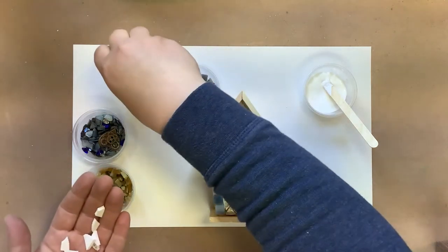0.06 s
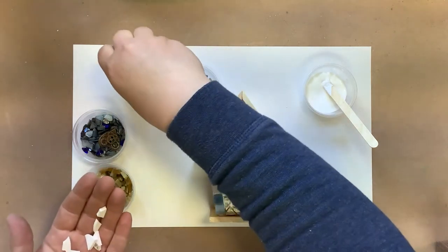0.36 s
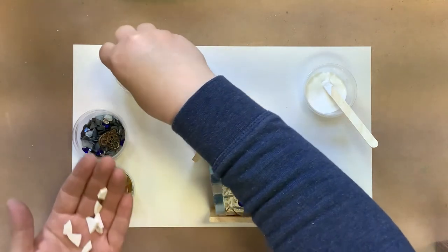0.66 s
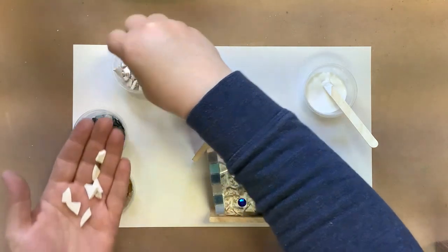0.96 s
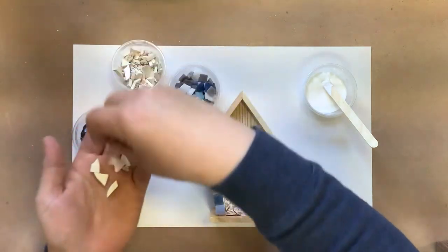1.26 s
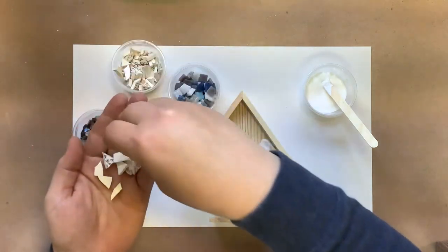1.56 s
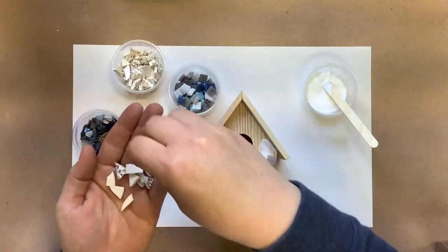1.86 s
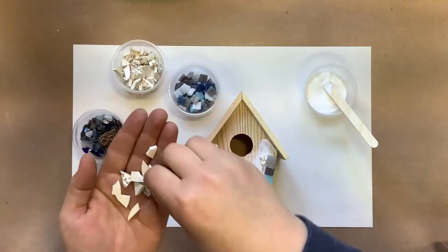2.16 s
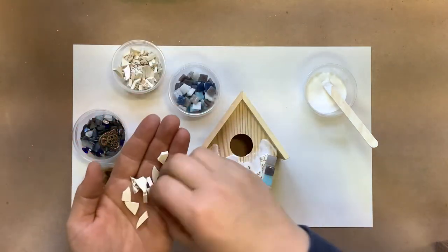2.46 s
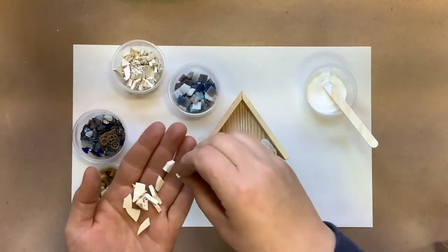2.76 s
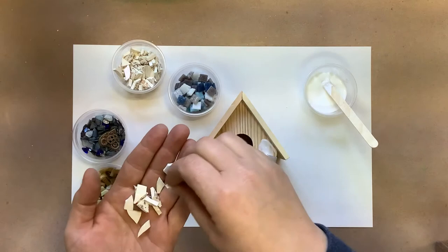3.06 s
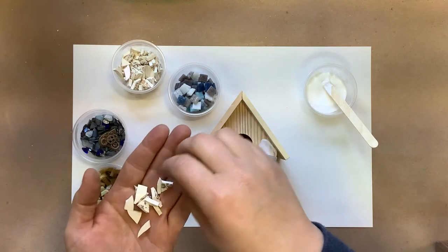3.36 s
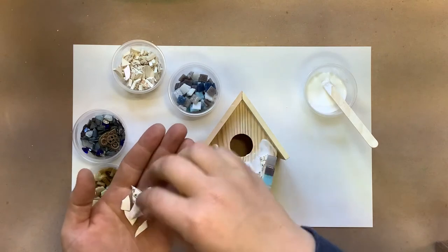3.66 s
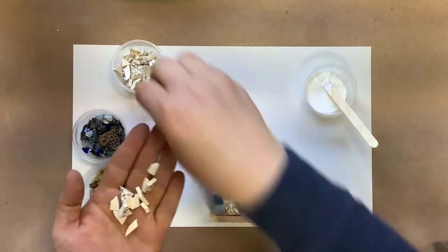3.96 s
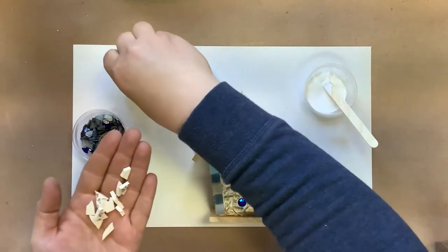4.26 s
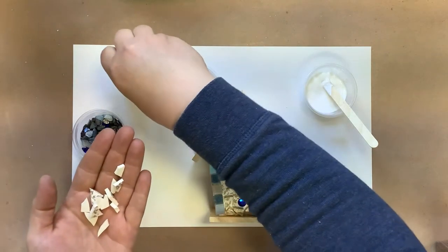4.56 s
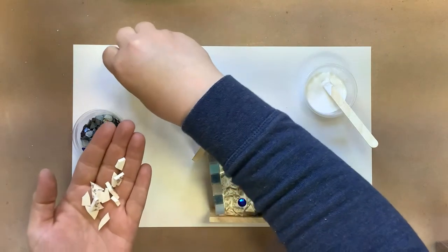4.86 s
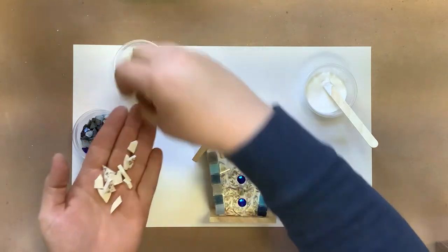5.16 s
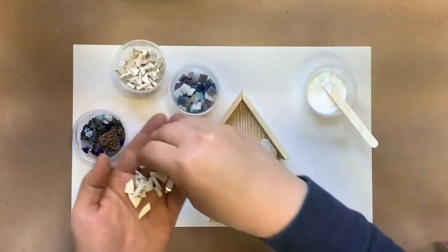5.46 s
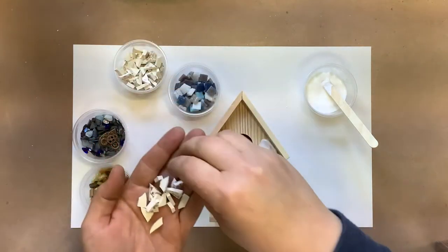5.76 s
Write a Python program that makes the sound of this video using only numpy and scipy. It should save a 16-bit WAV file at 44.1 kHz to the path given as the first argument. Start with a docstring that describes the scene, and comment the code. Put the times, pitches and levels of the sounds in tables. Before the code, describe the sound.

Fingers dig twice through shell fragments in a small plastic cup, with tiny clinks in between, in a quietly humming room.

```python
"""A hand digs through broken shell in a small plastic cup on a table: pieces crunch in avalanches of
contacts, one knocks the wall, and the table top drones faintly. Picked pieces drop into the other
palm and are nudged about: tiny damped clinks, faint rasps, one dull creak, a brushing sleeve.
At 4.2 s the hand digs again; a few last clinks follow.
Throughout, a small room answers and a mains appliance hums."""
import sys
import numpy as np
from scipy import signal
from scipy.fft import rfft, irfft, next_fast_len
from scipy.io import wavfile
from scipy.ndimage import map_coordinates

SR = 44100
rng = np.random.default_rng(int(sys.argv[2]) if len(sys.argv) > 2 else 0)


def store_wav(level_fs):
    """Save 16-bit WAV to argv[1]."""
    pcm = np.round(np.clip(np.atleast_2d(level_fs), -1, 1) * 32767)
    wavfile.write(sys.argv[1], SR, pcm.T.astype(np.int16))


N = 265790

# fingers shove the heap (start [s], length [s], level [dB], piece pitch [Hz])
HEAP_SHOVES = [(0.073, 0.013, -41, 10000), (0.093, 0.016, -41, 4000), (0.134, 0.0093, -40.5, 9500),
               (0.15, 0.0039, -32.5, 9500), (0.157, 0.0037, -32, 2330), (0.166, 0.016, -38.5, 10000),
               (0.201, .02, -39.5, 6000), (0.289, .008, -40.5, 6000), (0.304, .011, -35.5, 6000),
               (0.313, 0.0026, -36, 1800), (0.35, 0.0022, -37.5, 12000), (0.464, 0.0024, -35.5, 11000),
               (0.482, 0.0032, -36, 11000), (0.497, 0.031, -38.5, 6000), (0.529, .013, -32, 7500),
               (0.571, 0.013, -42.5, 5980), (0.596, .011, -43.5, 6000), (0.648, 0.0056, -31.5, 6000),
               (0.794, 0.0022, -40, 5000), (0.813, .003, -36.5, 5000), (0.823, 0.0018, -37, 6000),
               (0.832, .018, -44, 4000), (4.214, 0.0025, -41, 11000), (4.234, 0.024, -45, 4000),
               (4.343, 0.0033, -41.5, 10000), (4.39, 0.014, -34.5, 10000), (4.411, 0.014, -36, 2500),
               (4.426, .016, -31, 9500), (4.522, .004, -38, 6000), (4.549, 0.024, -38.5, 6000),
               (4.574, .015, -29, 6000), (4.616, 0.0046, -43.5, 2300), (4.709, 0.0042, -34, 6000),
               (4.72, 0.01, -36.5, 6000), (4.758, .008, -38.5, 6000), (4.766, 0.0029, -31.5, 5000),
               (4.812, 0.0091, -39, 2500), (4.88, 0.0018, -32.5, 4920), (4.976, 0.0018, -50.5, 5500),
               (5, 0.0022, -45.5, 6000), (5.012, .002, -41, 9600), (5.021, 0.0016, -35, 3200),
               (5.047, 0.0022, -45.5, 5500)]
# hand keeps the heap sliding (start [s], deepest [s], end [s], top level [dB], swell [dB])
HAND_DIGS = [(0, 0.526, 0.91, -48.5, 2.5), (4.194, 4.55, 4.957, -43.5, 17)]
# heap spectrum (frequency [Hz], relative level [dB])
HEAP_SPECTRUM = [(150, -8.5), (480, -9), (650, -4.5), (900, -5.5), (1400, -4), (2200, 1), (2950, -7),
                 (3600, -2.5), (4700, -5.5), (5500, -1), (8000, -3), (9400, 0), (11000, -4), (13200, -1.5),
                 (15500, -12.5)]
# resonances of the filled cup (centre [Hz], width [Hz], lift [dB])
CUP_RESONANCES = [(1280, 120, 4), (2000, 160, 3), (2320, 130, 4), (2630, 130, 6), (3850, 400, 4),
                  (5030, 160, 3), (6000, 450, 5), (6590, 120, 3)]
# pieces hit the cup wall (time [s], relative level [dB])
WALL_KNOCKS = [(0.3132, -28.5), (5.024, -49)]
# cup wall modes (frequency [Hz], relative level [dB], t60 [s])
WALL_MODES = [(1270, -6, 0.03), (1548, -3, 0.06), (2118, -4, 0.08), (2320, 5, .04), (2480, -6, .02),
              (2646, -2, 0.06), (2850, -17, .04), (3483, -10.5, 0.027)]
# pieces touch in the palm (time [s], relative level [dB], pitch [Hz])
PALM_CLINKS = [(1.2567, -28, 11800), (1.2645, -21.5, 8800), (1.2743, -20.5, 10900), (1.3368, -25.5, 9600),
               (1.348, -24, 9350), (1.357, -28.5, 13000), (1.4581, -33.5, 13700), (1.6765, -39.5, 9300),
               (2.2617, -34.5, 13100), (2.4339, -33.5, 9000), (2.6802, -35, 13800), (3.139, -36.5, 13900),
               (3.161, -39, 9400), (3.455, -42, 10800), (3.485, -37, 13300), (3.4976, -32, 13700),
               (3.6397, -39.5, 13200), (3.6875, -49, 12400), (3.8042, -38.5, 10350), (5.3097, -27, 10300),
               (5.3706, -30, 11000), (5.3884, -27.5, 9600), (5.5474, -34.5, 12300), (5.9918, -43, 10400)]
# crack of a small piece (frequency [Hz], relative level [dB])
CRACK_SPECTRUM = [(500, -38), (1500, -28), (3500, -24), (5500, -12), (7800, -7), (9200, 2), (11200, -4),
                  (13400, 1), (15500, 1)]
# fingertips drag pieces in the palm (start [s], length [s], level [dB])
PALM_RUBS = [(1.335, .03, -49), (2.2, .1, -69), (2.24, .028, -60), (2.33, .06, -70), (2.617, .018, -70),
             (3.453, .008, -52), (3.475, .07, -60)]
# rasp of dragged pieces (frequency [Hz], relative level [dB])
RASP_SPECTRUM = [(700, -20), (2100, -7), (3200, -15), (6500, 2), (9500, 5.5), (15000, -4)]
# fingers press cup on table (start [s], hardest [s], end [s], relative level [dB], swell [dB])
CUP_PRESSES = [(0, .55, 0.88, -58.5, 10), (4.437, 4.47, 4.74, -52.5, 7)]
# sleeve brushes (start [s], length [s], level [dB])
SLEEVE_BRUSHES = [(1.656, .22, -82), (2.463, 0.19, -80.5), (5.098, 0.39, -83), (5.654, 0.35, -85.5)]
# room decay (frequency [Hz], t60 [s])
ROOM_DECAY = [(300, 0.66), (2000, 0.4), (8000, 0.31), (15000, 0.073)]
# mains hum partials (frequency [Hz], rms level [dB])
HUM_PARTIALS = [(120, -81), (240, -68.5), (359.8, -55.5), (420, -77), (480, -83.5), (600, -86)]
# room air (frequency [Hz], relative level [dB])
AIR_SPECTRUM = [(25, -34), (38, -12), (60, -5), (108, 2), (140, -1.5), (190, -3), (280, -3), (400, -7),
                (700, -19.5), (1000, -22), (1300, -26), (2000, -28), (4000, -34.5), (5700, -28),
                (15500, -30)]
# microphone response (frequency [Hz], gain [dB])
MIC_RESPONSE = [(22, -22), (40, 0), (13600, 0), (14300, -2), (14850, -8), (15450, 3), (15750, 1),
                (16000, -12)]


def shoves(build_db=2.5, usual_s=0.0097, usual_hz=6000, sparkle_db_per_oct=3):
    """Each shove builds an avalanche of contacts; long ones sound fuller and settle more slowly."""
    out, t = np.zeros(N), np.arange(SR // 16) / SR
    for start_s, length_s, db, piece_hz in HEAP_SHOVES:
        settle_s = 0.0055 * (length_s / usual_s) ** 0.49
        build = amp(build_db * np.minimum(t / length_s, 1))
        settle = np.exp(-np.maximum(t - length_s, 0) / settle_s)
        hits = contacts(len(t), per_s=8000, spread_db=3.5) * build * settle
        weight_db = 1.5 * np.log2(length_s / usual_s)
        treble_db = 0.5 + sparkle_db_per_oct * np.log2(piece_hz / usual_hz)  # small pieces are brighter
        tilt = [(700, weight_db), (1400, -1), (2600, -1), (4000, 0), (6500, 0), (9000, treble_db)]
        colour = lambda hz: cup_db(hz) + along(tilt, hz) + lift(hz, piece_hz, 0.34 * piece_hz, db=5)
        burst = coloured(shards(hits, t60_s=0.0067, ringing=0.94), colour)
        add(out, start_s, amp(db) * np.sqrt(length_s * SR) * unit_energy(burst))
    return out


def stirring(uneven_db=2.5, snap_db=-8):
    """Pieces scrape in fine, uneven slips; now and then one snaps free."""
    slips = shards(contacts(N, per_s=1600, spread_db=0.5), t60_s=0.004, ringing=0.67)
    slips *= amp(uneven_db * wobble(60))
    snaps = shards(contacts(N, per_s=60, spread_db=6), t60_s=0.0084, ringing=1)
    heap = coloured(unit_rms(slips) + amp(snap_db) * unit_rms(snaps), cup_db)
    return sum(gesture(*dig) for dig in HAND_DIGS) * unit_rms(heap)


def contacts(size, per_s, spread_db):
    """Random impulses of uneven strength."""
    happens = rng.random(size) < per_s / SR
    return happens * rng.choice([-1, 1], size) * amp(spread_db * np.clip(rng.standard_normal(size), -2, 2))


def shards(hits, t60_s, ringing):
    """Each contact is a dry tick plus the short ring of a piece of random size."""
    t, onsets = np.arange(SR // 100) / SR, np.flatnonzero(hits)
    modes = ring(t, rng.uniform(1494, 15870, (len(onsets), 1)), t60_s)
    modes *= ringing * hits[onsets, None] / np.linalg.norm(modes, axis=1, keepdims=True)
    samples = onsets[:, None] + np.arange(len(t))
    return hits + np.bincount(samples.ravel(), modes.ravel(), len(hits))[:len(hits)]


def cup_db(hz):
    """Heap spectrum, lifted at the cup's resonances."""
    return along(HEAP_SPECTRUM, hz) + sum(lift(hz, *resonance) for resonance in CUP_RESONANCES)


def gesture(start_s, peak_s, end_s, db, swell_db, release_db_per_s=269):
    """Gain of one push of the hand: swell, ease off, let go."""
    t = np.arange(N) / SR
    outside_s = np.maximum(start_s - t, 0) + np.maximum(t - end_s, 0)
    below_peak_db = np.interp(t, [start_s, peak_s, end_s], [swell_db, 0, swell_db])
    return amp(db - below_peak_db - release_db_per_s * outside_s)


def knocks(gain_db=-5, scatter_db=0.97):
    """The thin plastic wall rings briefly when a piece snaps against it."""
    out, t = np.zeros(N), np.arange(SR // 5) / SR
    for time_s, db in WALL_KNOCKS:
        wall = sum(amp(mode_db + rng.normal(0, scatter_db)) * ring(t, hz, t60_s)
                   for hz, mode_db, t60_s in WALL_MODES)
        add(out, time_s, amp(db + gain_db) * wall)
    return out


def clinks(gain_db=11, lag_s=0.0007, rebound_db=-9, rock_gap_s=0.011, rock_db=-15.5, loss_db=1.5):
    """Each touch clinks, rebounds once and rocks to rest in three weaker ticks."""
    out = np.zeros(N)
    for time_s, db, hz in PALM_CLINKS:
        gain = amp(db + gain_db)
        add(out, time_s + lag_s, gain * clink(hz))
        add(out, time_s + rng.uniform(0.0022, 0.005), gain * amp(rebound_db) * clink(hz))
        for k, delay_s in enumerate(np.cumsum(rock_gap_s * rng.uniform(0.5, 1.5, 3))):
            tick = clink(hz=rng.uniform(9000, 13500))
            add(out, time_s + delay_s, gain * amp(rock_db - loss_db * k) * tick)
    return out


def clink(hz, t60_s=0.004, contact_s=0.0002, others_db=-6, crack_db=5, crack_t60_s=0.005):
    """A piece damped by the palm: one main mode, three weaker ones and a crack."""
    t = np.arange(SR // 40) / SR
    attack = 1 - np.exp(-t / contact_s)
    others = sum(ring(t, other_hz, t60_s) for other_hz in rng.uniform(7400, 14000, 3))
    modes = attack * (ring(t, hz, t60_s) + amp(others_db) * others)
    burst = rng.standard_normal(len(t)) * attack * decay(t, crack_t60_s)
    crack = coloured(burst, lambda f: along(CRACK_SPECTRUM, f) + lift(f, hz, width_hz=1800, db=7))
    return unit_energy(modes + amp(crack_db) * crack)


def rubs():
    """Dragged pieces rasp, swelling and fading with the stroke."""
    out = np.zeros(N)
    for start_s, length_s, db in PALM_RUBS:
        size = round(length_s * SR)
        grit = shards(contacts(size, per_s=1900, spread_db=12), t60_s=0.023, ringing=1)
        rasp = coloured(grit, lambda hz: along(RASP_SPECTRUM, hz))
        stroke = np.sqrt(np.abs(np.sin(np.linspace(0, np.pi, size))))
        add(out, start_s, amp(db) * unit_rms(rasp) * stroke)
    return out


def creak(start_s=1.602, length_s=0.028, from_hz=1400, to_hz=300, body_hz=690, gain_db=-54):
    """The hands meet with a dull creak: seven slips, falling in pitch."""
    out, t = np.zeros(N), np.arange(SR // 10) / SR
    attack = 1 - np.exp(-t / 0.0001)
    for progress in np.linspace(0, 1, 7):
        hz = from_hz * (to_hz / from_hz) ** progress
        slip = ring(t, hz, t60_s=18 / hz) + 0.8 * ring(t, body_hz, t60_s=0.026)
        time_s = start_s + length_s * progress + rng.normal(0, 0.00055)
        add(out, time_s, amp(gain_db) * slip * attack)
    return out


def table_drone(hz=107, gain_db=-2, drift_rad=0.9, waver_db=2):
    """Rummaging drives the table top's lowest mode, a little unsteadily."""
    phase = 2 * np.pi * hz * np.arange(N) / SR + drift_rad * wobble(14)
    drone = np.sin(phase) * amp(waver_db * wobble(20))
    return amp(gain_db) * sum(gesture(*press) for press in CUP_PRESSES) * unit_rms(drone)


def sleeve(centre_hz=1350, width_hz=500):
    """Cloth slides as the arm moves: a soft, narrow-band swish."""
    out = np.zeros(N)
    for start_s, length_s, db in SLEEVE_BRUSHES:
        size = round(length_s * SR)
        swish = coloured(rng.standard_normal(size), lambda hz: lift(hz, centre_hz, width_hz, db=30))
        add(out, start_s, amp(db) * unit_rms(swish) * np.sin(np.linspace(0, np.pi, size)))
    return out


def room(sound, near_db=-8.5, tail_db=-13):
    """Quick reflections off the table and things on it, then the room's tail."""
    hz, frame_s, spectra = signal.stft(rng.standard_normal(SR // 2), SR, nperseg=256)
    fade = amp(-60 * frame_s / along(ROOM_DECAY, hz)[:, None])
    tail = signal.istft(spectra * fade, SR, nperseg=256)[1]
    t = np.arange(len(tail)) / SR
    tail *= t > 0.006
    near = contacts(len(t), per_s=5000, spread_db=2) * decay(t, t60_s=0.09) * (t > 0.001)
    response = amp(near_db) * unit_energy(near) + amp(tail_db) * unit_energy(tail)
    return signal.fftconvolve(sound, response)[:N]


def mains_hum(waver_db=0.67):
    """An appliance hums; each partial wavers slightly in level."""
    t = np.arange(N) / SR
    return sum(amp(db + waver_db * wobble(4.45)) * unit_rms(np.sin(2 * np.pi * (hz * t + rng.random())))
               for hz, db in HUM_PARTIALS)


def room_air(rms_db=-65):
    """Soft, steady, bass-heavy noise."""
    return amp(rms_db) * unit_rms(coloured(rng.standard_normal(N), lambda hz: along(AIR_SPECTRUM, hz)))


def amp(db):
    """Decibels to gain."""
    return 10 ** (np.asarray(db) / 20)


def unit_rms(x):
    """x at rms 1."""
    return x / np.sqrt(np.mean(x ** 2) + 1e-20)


def unit_energy(x):
    """x at energy 1."""
    return x / np.linalg.norm(x)


def decay(t, t60_s):
    """Exponential fall, 60 dB in t60_s."""
    return np.exp(-np.log(1000) * t / t60_s)


def ring(t, hz, t60_s):
    """One struck mode."""
    return np.sin(2 * np.pi * hz * t) * decay(t, t60_s)


def lift(hz, centre_hz, width_hz, db):
    """dB bump of one resonance."""
    return db / (1 + (2 * (hz - centre_hz) / width_hz) ** 2)


def along(points, hz):
    """Interpolate (frequency [Hz], value) points on a log axis."""
    point_hz, values = np.transpose(points)
    return np.interp(np.log(hz + 1), np.log(point_hz + 1), values)


def wobble(knots_per_s):
    """Smooth random curve."""
    knots = rng.standard_normal(int(N * knots_per_s / SR) + 4)
    return map_coordinates(knots, [np.arange(N) * knots_per_s / SR])


def coloured(x, db_of_hz):
    """Minimum-phase filter with this dB shape and mean power gain 1."""
    size = 2 * next_fast_len(len(x))
    gain = unit_rms(amp(db_of_hz(np.fft.rfftfreq(size, 1 / SR))))
    cepstrum = irfft(np.log(gain), size)
    cepstrum[1:size // 2] *= 2
    cepstrum[size // 2 + 1:] = 0
    return irfft(rfft(x, size) * np.exp(rfft(cepstrum)), size)[:len(x)]


def add(track, time_s, sound):
    """Mix a sound in at time_s."""
    part = track[max(round(time_s * SR), 0):][:len(sound)]
    part += sound[:len(part)]


def scene():
    """Cup, palm and table in the humming room; mono."""
    handling = shoves() + stirring() + knocks() + clinks() + rubs() + creak() + sleeve()
    return (handling + room(handling) + table_drone() + mains_hum() + room_air())[None]


def record(dry):
    """The microphone cuts deep bass, notches the top treble and passes nothing above top_hz."""
    size, top_hz = next_fast_len(N + SR // 2), 16500
    hz = np.fft.rfftfreq(size, 1 / SR)
    gain = amp(along(MIC_RESPONSE, hz)) * (hz < top_hz)
    return irfft(rfft(dry, size) * gain, size)[:, :N]


dry = scene()
out = record(dry)
store_wav(out)
```